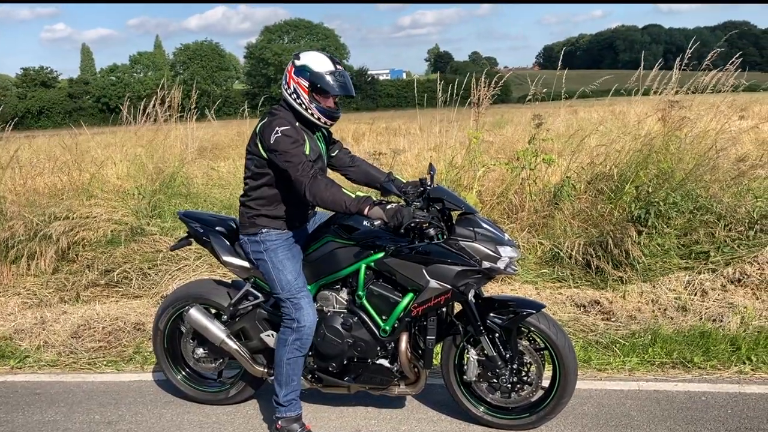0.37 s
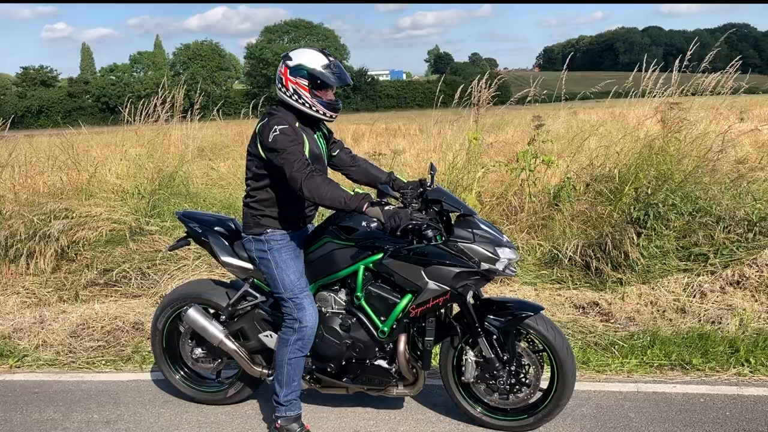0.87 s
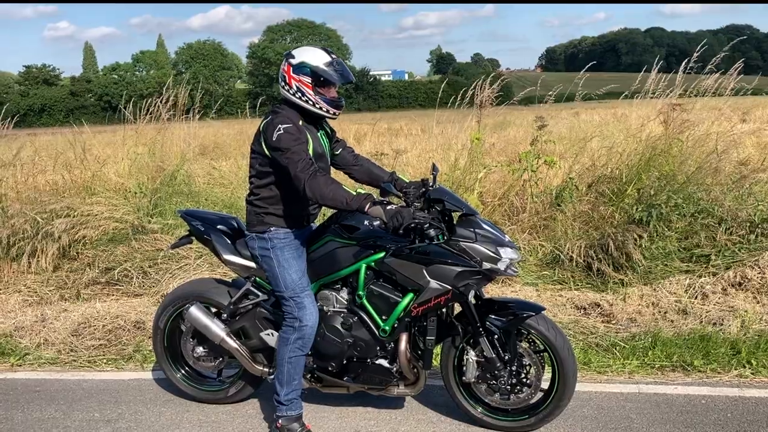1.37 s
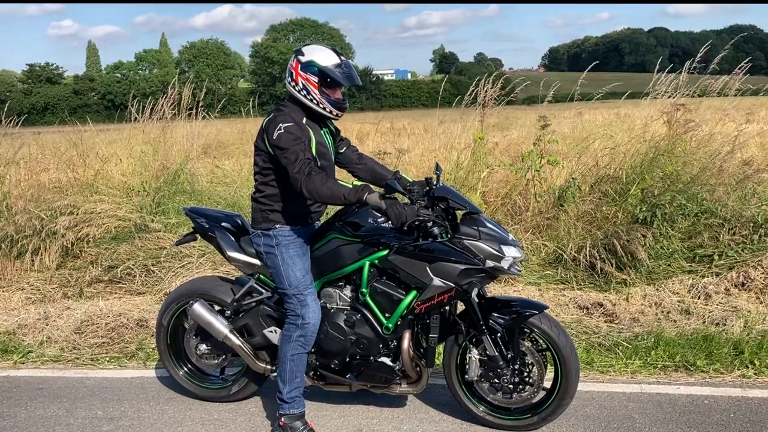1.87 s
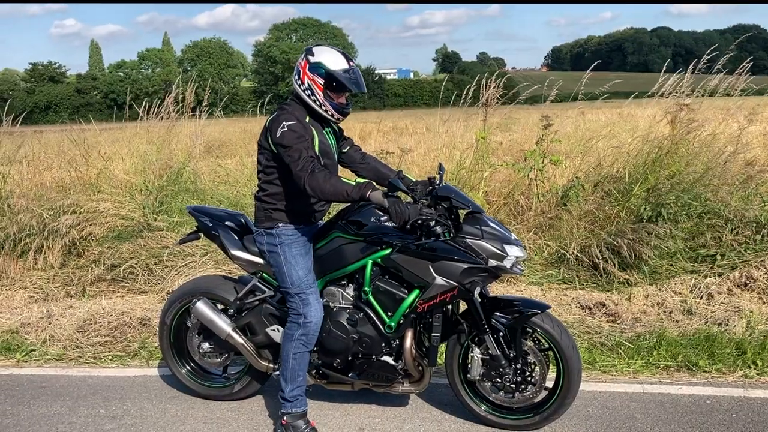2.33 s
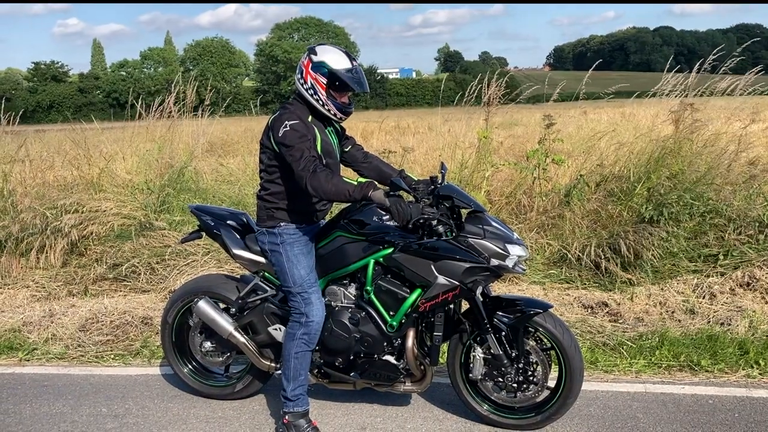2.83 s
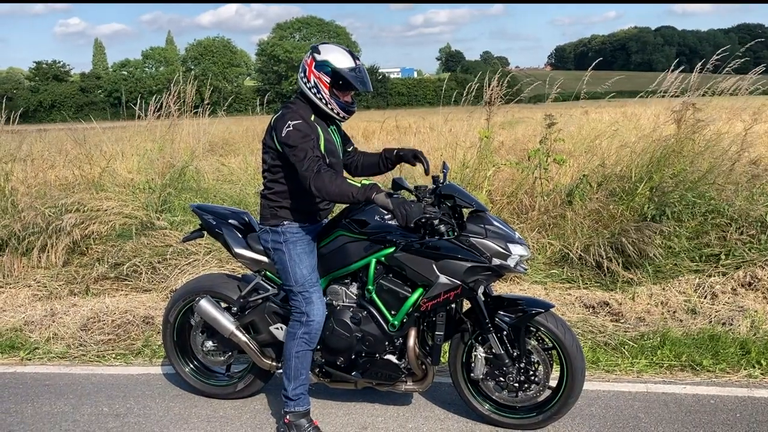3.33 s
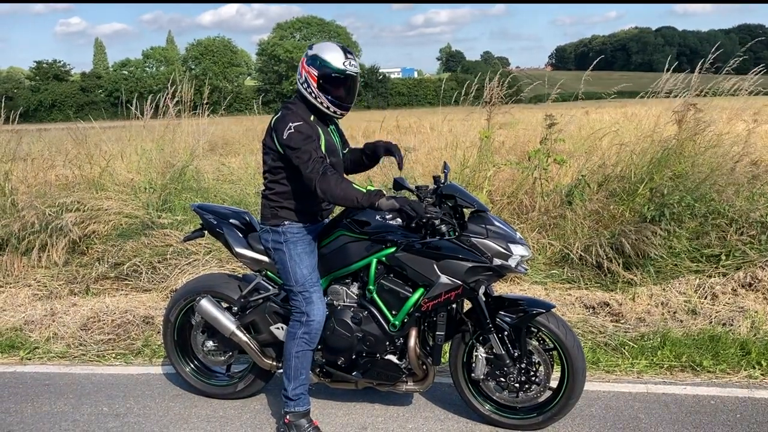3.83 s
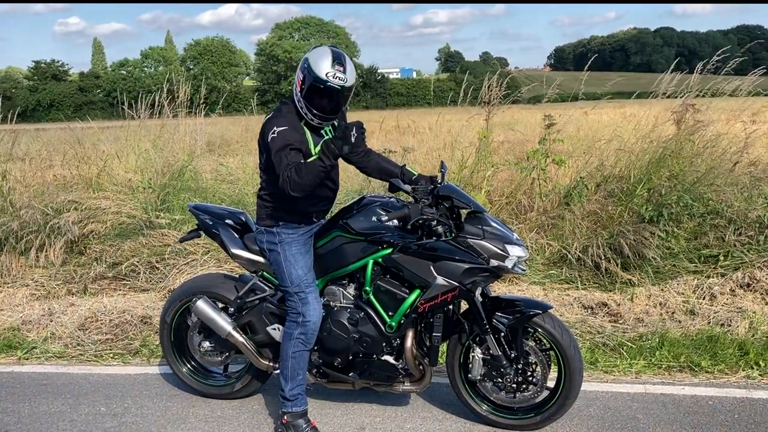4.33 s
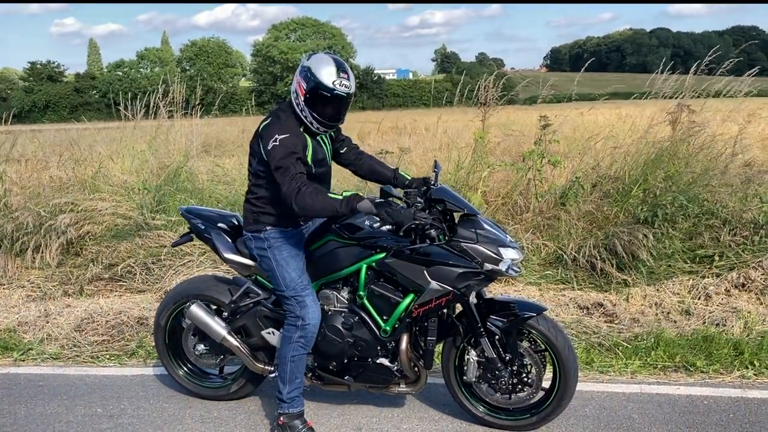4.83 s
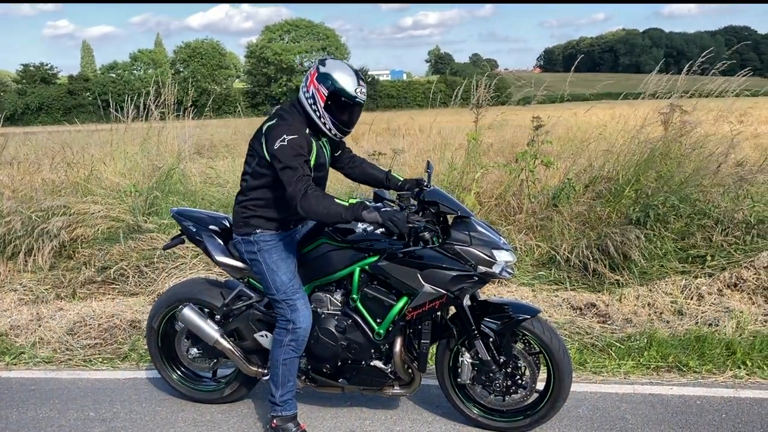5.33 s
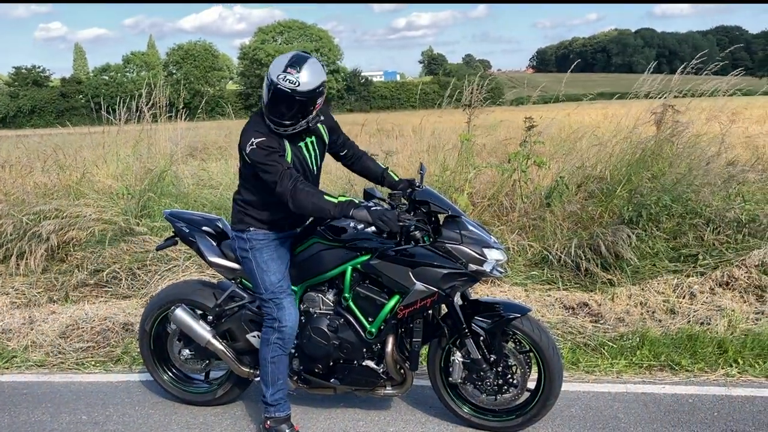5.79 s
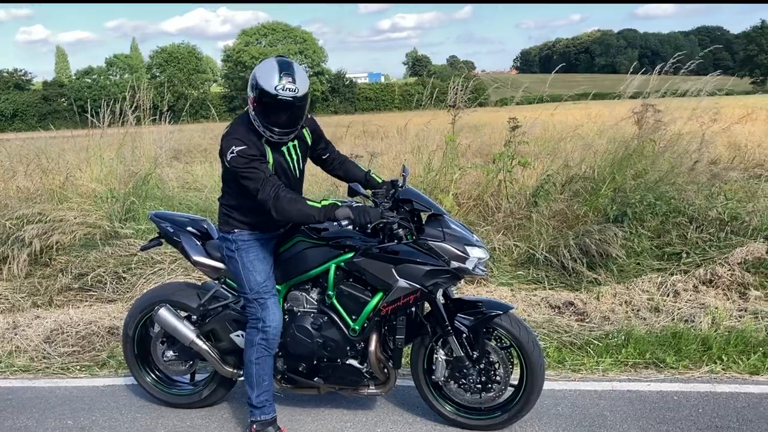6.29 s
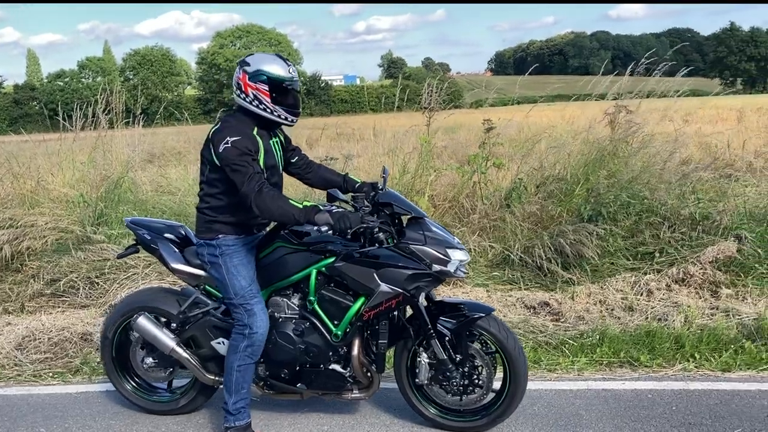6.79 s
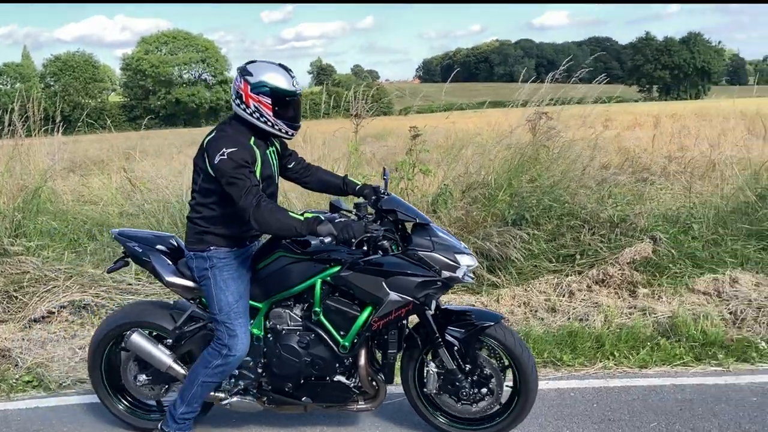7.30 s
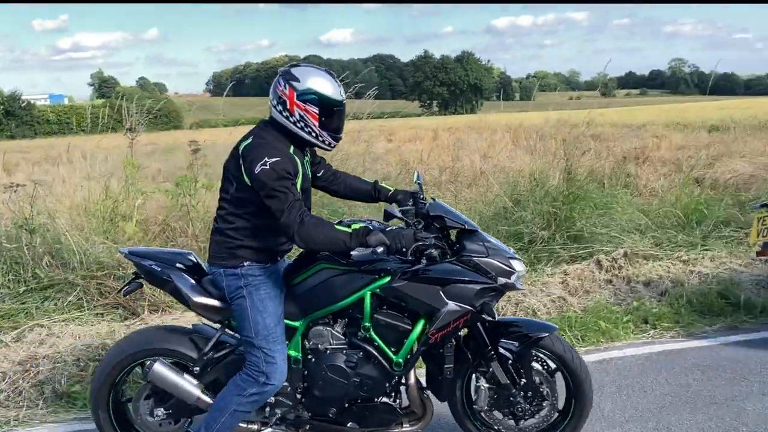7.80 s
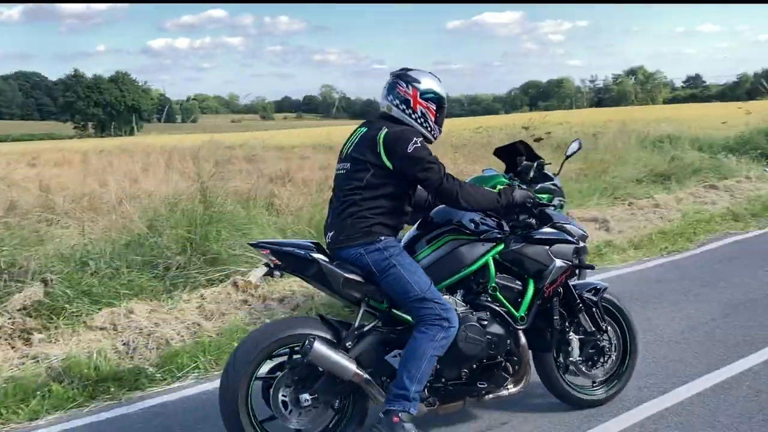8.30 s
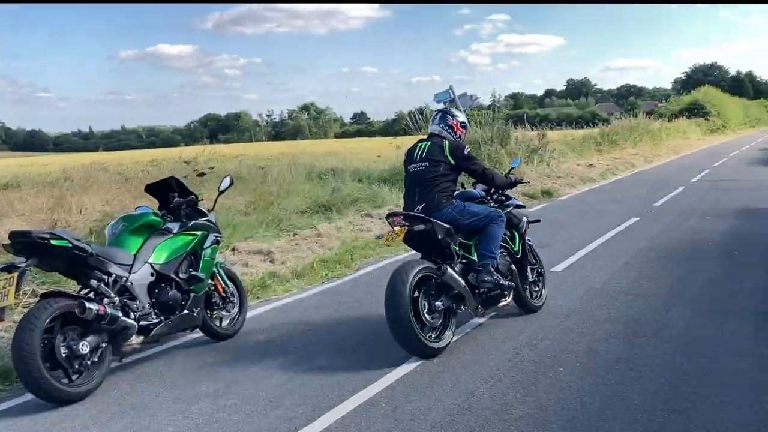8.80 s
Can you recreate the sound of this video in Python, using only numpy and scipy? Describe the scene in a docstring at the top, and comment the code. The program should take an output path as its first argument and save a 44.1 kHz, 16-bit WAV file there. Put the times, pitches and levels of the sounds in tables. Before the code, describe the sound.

Open roadside, close stereo microphone. From 0 to 0.8 s there is only soft distant air, low wind puffs, a very thin electric whine and faint clicks. A grinding, whining starter labours from 0.8 to 1.3 s, with sharp knocks. The four-cylinder engine catches with a couple of strong surges and settles by 1.7 s into a deep, even, booming idle with mechanical clatter. At 2.7 s a hard blip barks upward; a second at 3.05 s peaks higher around 3.2 s, then the revs fall unevenly until 4.2 s. A quieter idle hunts in lumpy pulses to 5.5 s, with loud metallic knocks near 5.1 and 5.5 s and a wavering thin whistle until 6.4 s. A soft-edged blip comes at 5.6 s, then quick stabs at 6.4, 6.7 and 6.9 s with more knocks. From 7 s it pulls away under load, roaring with singing gear whine, peaking around 7.5 s, dropping in pitch, dulling after 8.3 s, and rising slightly at the end at 9.1 s.

```python
"""A four-cylinder motorcycle at the roadside: it catches, idles, is blipped, hunts and pulls away.
The exhaust sums harmonics of the firing rate; clatter is noise puffed by each firing; gear whine is sines
locked to the crank. Before it, quiet air, wind puffs, a thin electric whine and a grinding starter; knocks
are coloured noise bursts and a thin whistle comes and goes at idle. All is heard in stereo."""
import sys
import numpy as np
from scipy import signal
from scipy.fft import rfft, irfft, next_fast_len
from scipy.io import wavfile
from scipy.ndimage import uniform_filter1d

SR = 44100
rng = np.random.default_rng(int(sys.argv[2]) if len(sys.argv) > 2 else 0)


def gain_from_db(level_db):
    """Turn a decibel level (scalar or array-like) into a linear amplitude factor."""
    decades = np.asarray(level_db, float) / 20
    return 10 ** decades


def generate_wav(signal):
    """Clip the signal to [-1, 1] and save it as 16-bit WAV at the path in sys.argv[1]."""
    frames = np.transpose(np.atleast_2d(signal))
    scaled = np.clip(frames, -1, 1) * 32767
    pcm = np.round(scaled).astype(np.int16)
    wavfile.write(sys.argv[1], SR, pcm)


N = 403515
T = np.arange(N) / SR

# Distant air. Each row: frequency in Hz, relative level in dB per Hz.
AIR_COLOUR = [(15, -22), (25, -4), (54, -2), (235, -16.5), (867, -16.5), (1610, -30), (2100, -37),
              (2440, -34), (3360, -46), (5500, -40), (9000, -55), (11700, -90), (19800, -120)]
AIR_RMS_DB = -49
# Thin electric whine of a pump, steady throughout. Each row: frequency in Hz, peak level in dB.
PUMP_TONES = [(1200, -66.5), (1604, -70), (1995, -77), (2406, -69)]
# Puffs of wind on the microphone. Each row: peak time in seconds, rms level in dB, 1/e half width in seconds.
GUSTS = [(.11, -55, .04), (.69, -42, 0.084), (1.08, -43, 0.14), (1.25, -35.5, .06)]
# Sharp metallic knocks. Each row: start in seconds, peak level in dB.
KNOCK_TIMES = [(0.018, -33), (0.331, -41), (0.791, -39), (0.822, -19.5), (1.179, -13), (1.448, -16),
               (1.764, -15), (4.502, -30), (5.075, -6.5), (5.114, -8.5), (5.139, -12.5), (5.182, -12.5),
               (5.336, -13.5), (5.547, -11.5), (5.572, -12), (6.358, -9), (6.399, -7.5), (6.645, -9),
               (6.827, -11.5)]
KNOCK_T60_S = 0.072
# Broad colour of engine clatter. Each row: frequency in Hz, relative level in dB per Hz.
CLATTER_COLOUR = [(150, -18), (300, -12), (450, -11.5), (700, -13.5), (1000, -12.5), (1500, -15),
                  (1900, -13), (2250, -15.5), (2800, -14.5), (3350, -17.5), (4000, -17), (5200, -19),
                  (6500, -21), (8500, -23), (11700, -23), (15500, -26)]
# Ringing of cases and bodywork. Each row: frequency in Hz, width in Hz, rise over the broad colour in dB.
CASE_RINGS = [(544, 80, 7), (877, 90, 4), (1200, 130, 8), (1870, 170, 8), (2620, 260, 7.5), (3780, 200, 3),
              (4200, 240, 2)]
# Starter. Each row: time in seconds, gear mesh in Hz, whine level in dB, grind rms level in dB.
STARTER_RUN = [(.82, 700, -60, -33), (.91, 860, -35, -37), (.96, 800, -35, -37), (1.03, 630, -33, -31),
               (1.065, 500, -38, -30), (1.115, 535, -41, -35), (1.13, 540, -55, -44),
               (1.168, 540, -60, -46), (1.18, 560, -44, -27), (1.21, 625, -38, -32), (1.3, 700, -50, -35)]
# Starter grind. Each row: frequency in Hz, relative level in dB per Hz.
GRIND_COLOUR = [(120, -61), (200, -21), (789, -7), (864, -9), (980, -5.5), (1980, -3), (4640, -15),
                (6770, -13.5), (15000, -41)]
# Engine speed, to which the hunting wobble is added. Each row: time in seconds, firings per second.
FIRING_RATE = [(1.27, 48.4), (1.41, 58), (1.58, 51.5), (2.0, 48), (2.69, 48.4), (2.77, 80), (2.825, 104.5),
               (2.855, 109.5), (3.05, 82.8), (3.205, 142.5), (3.44, 107.2), (3.51, 97.8), (3.86, 64),
               (4.1, 52.4), (4.3, 48.4), (4.98, 44.5), (5.51, 44.2), (5.7, 60.9), (5.92, 46.5),
               (6.345, 40.9), (6.495, 77.5), (6.6, 62.9), (6.74, 81.4), (6.825, 73.9), (7.005, 105.8),
               (7.18, 104.3), (7.37, 120.5), (7.48, 122.8), (7.59, 118.9), (7.72, 108.2), (7.92, 98.4),
               (8.74, 90), (8.83, 81.2), (8.91, 91), (8.97, 88.5), (9.04, 95.5), (9.15, 100.5)]
# Slow level under blips and surges. Each row: time in seconds, exhaust in dB, clatter in dB before its gain.
SLOW_LEVELS = [(1.27, -24, -37.5), (1.5, -16.5, -36.5), (1.75, -14, -37), (2.68, -13, -37),
               (2.92, -11.5, -33.5), (3.17, -13, -33.5), (3.25, -7.5, -30), (3.5, -13, -37),
               (3.8, -15.5, -41), (3.97, -22.5, -45), (4.4, -22.5, -41.5), (5.5, -23, -42),
               (5.78, -20, -41.5), (5.86, -16.5, -41), (6.2, -16.5, -39.5), (6.34, -17.5, -41),
               (6.58, -13.5, -39), (6.82, -10.5, -38), (7.02, -15.5, -38.5), (7.29, -9.5, -33.5),
               (7.66, -12, -36), (8.16, -11.5, -37), (8.75, -12, -41.5), (9.15, -13.5, -43.5)]
CLATTER_GAIN_DB = 12
# Uneven firing, throttle shut. Each row: time in seconds, spread of firing strength in dB.
UNEVEN_FIRING = [(1.27, 3.5), (1.7, 2.5), (1.8, .5), (2.7, .5), (2.88, 1.2), (2.98, 1.5), (3.03, 3.5),
                 (3.2, .8), (3.4, 1.5), (3.5, 5), (3.9, 5), (4.4, 2.5), (5.55, 2.5), (5.75, 4), (5.95, 1.5),
                 (6.34, .8), (6.56, 4), (6.8, .6)]
# Throttle openings, the last the pull away. Each row: opening and shutting times in seconds, exhaust rise in dB,
# clatter rise in dB, load from 0 to 1.
THROTTLE_OPENINGS = [(2.669, 2.835, 2.5, 7, 0.81), (3.04, 3.18, 0.5, 3.5, 0.67),
                     (5.54, 5.718, 12, 4.5, 0.11), (6.346, 6.496, 8.5, 6, 0.2), (6.606, 6.76, 6, 5, 0.28),
                     (6.813, 6.956, 5.5, 8.5, 0.57), (6.925, 9.297, 0, 0, 0.9)]
OPENING_S, CLOSING_S = 0.0533, 0.032
OPEN_SPREAD_DB, OPEN_SHARP_DB_PER_OCTAVE = .4, 1.8  # an open throttle fires evenly and sharply
# shut, pulses soften by this many dB per octave for each firing per second over idle
IDLE_FIRINGS_PER_S, OVERRUN_SHARP_DB = 48, -.11
# Runs of strong firings, catching and hunting. Each row: peak in seconds, rise in dB, 1/e half width in seconds.
STRONG_RUNS = [(1.31, 10, 0.048), (1.39, 10, 0.033), (1.53, 4.5, 0.034), (1.6, 1.5, 0.038), (3.84, 4, .04),
               (4.15, 5, 0.054), (4.25, 4, 0.027), (4.382, 8, 0.049), (4.535, 9, 0.052), (4.719, 8, 0.063),
               (4.869, 10.5, 0.038), (5.05, 11, 0.041), (5.239, 8.5, 0.045), (5.41, 7.5, 0.0503),
               (5.53, 7.5, 0.018)]
CLATTER_DB_PER_SURGE_DB = 0.34
# Exhaust pipe, throttle shut. Each row: frequency in Hz, relative level in dB.
PIPE_COLOUR = [(20, -80), (48, -5), (96, -6.5), (145, 2.5), (195, -2.5), (245, -8.5), (300, -22),
               (380, -32), (480, -64), (550, -24), (700, -61), (1100, -31)]
SMEAR_RAD = 0.243  # per squared harmonic number: the pipe spreads each pulse in time
# Pulses at open throttle. Each row: multiple of the firing rate, relative level in dB before the pipe.
LOADED_ORDERS = [(0.5, -27), (1, 0), (1.5, -10), (2, 0.5), (2.5, -18), (3, -8), (3.5, -39), (4, -6.5),
                 (4.5, -34), (5, -12.5), (5.5, -47), (6, -17), (7, -23), (8, -22.5), (9, -29)]
# Exhaust pipe at open throttle. Each row: frequency in Hz, gain in dB.
OPEN_PIPE_COLOUR = [(60, 0.5), (110, 1.5), (190, 4), (240, 1.5), (275, 3), (310, -3), (370, -1.5), (470, 2),
                    (540, 1), (620, 3.7), (800, -3), (1000, 2)]
LEAVING_S, DULLING_DB = 8.3, -5.5  # past this time upper orders fade, in dB per octave per second
REVVING_DB = .012  # rise of upper orders per octave for each firing per second squared of speeding up
GEAR_TEETH_PER_FIRING, LOWER_TEETH_PER_FIRING = 24.9, 16.4
# Gear whine. Each row: time in seconds, level in dB before its gain, body colour and pull.
WHINE_LEVEL = [(1.27, -50), (2.68, -46), (2.82, -31), (2.9, -39), (3.22, -40), (3.47, -32), (3.9, -50),
               (4.4, -49), (4.6, -44), (5.55, -42), (6.0, -51), (6.34, -46), (6.47, -33), (6.56, -44),
               (6.74, -33), (6.9, -40), (7.0, -26), (7.5, -30), (7.75, -37), (8.2, -45), (9.15, -47)]
# Other gear tones. Each row: time in seconds, octave of the whine in dB, fuzzy lower mesh in dB.
GEAR_OVERTONES = [(1.27, -60, -62), (6.2, -54, -62), (6.75, -44, -60), (6.82, -32, -60), (6.88, -54, -60),
                  (7.15, -42, -50), (7.35, -44, -33), (7.75, -45, -33), (7.9, -35, -48), (8.4, -39, -58),
                  (8.9, -52, -62)]
# Thin whistle at idle. Each row: time in seconds, frequency in Hz, level in dB.
WHISTLE_RUN = [(4.7, 2600, -60), (4.82, 2600, -41), (5.0, 2700, -48), (5.25, 2800, -40), (5.5, 2700, -50),
               (5.95, 2900, -39), (6.1, 2830, -33), (6.28, 2680, -38), (6.4, 2600, -62)]
# Stereo image by frequency. Each row: frequency in Hz, left lead in radians, level balance left over right in dB,
# likeness of left and right from 0 to 1.
STEREO_IMAGE = [(40, -.2, 2.3, .95), (100, -.15, 1.9, .992), (380, -.3, 2.1, .99), (520, -.3, -1.5, .93),
                (900, -.4, 1.1, .97), (1500, -.3, 0, .97), (1900, .1, 0, .99), (2300, .7, 0, .9),
                (3000, .7, -.5, .9), (3500, 1.3, -1.5, .78), (4200, 1.9, -.5, .85), (4900, 2.5, 0, .8),
                (5300, np.pi, 0, 1), (5600, np.pi, 0, 1), (6100, 3.9, 0, .8), (6900, 4.8, 0, .75),
                (8100, 2 * np.pi, 0, 1), (8900, 2 * np.pi, 0, 1), (10000, 7.8, 0, .72),
                (11150, 3 * np.pi, 0, 1), (12350, 3 * np.pi, 0, 1), (13400, 11, 0, .78),
                (14550, 4 * np.pi, 0, 1)]


def read(points, hz):
    """Columns of a table at the frequencies hz."""
    f, *columns = np.transpose(points)
    return np.squeeze([np.interp(np.log(hz + 1), np.log(f + 1), c) for c in columns])


def curves(rows, t=T):
    """Columns of a time table."""
    s, *columns = np.transpose(rows)
    return [np.interp(t, s, c) for c in columns]


def evened(x):
    """Scales to rms 1."""
    return x / np.sqrt(np.mean(x ** 2) + 1e-20)


def coloured(x, db_of_hz):
    """Causal minimum-phase filter with the given gain curve."""
    log_gain = np.log(gain_from_db(db_of_hz(abs(np.fft.fftfreq(16384, 1 / SR)))))
    taps = np.fft.ifft(np.exp(log_gain - 1j * signal.hilbert(log_gain).imag)).real[:4096]
    return signal.oaconvolve(x, taps)[:len(x)]


def while_on(start_s, end_s):
    """Gate with soft edges."""
    return np.clip(np.minimum(T - start_s, end_s - T) / 0.0057, 0, 1)


def swell(s, width_s):
    """A smooth hump of height 1."""
    return np.exp(-((T - s) / width_s) ** 2)


def body_db(hz):
    """Broad clatter colour with the ringing of the cases on top."""
    rings_db = sum(db / (1 + (2 * (hz - f) / width) ** 2) for f, width, db in CASE_RINGS)
    return read(CLATTER_COLOUR, hz) + rings_db


def surroundings():
    """Coloured noise for air, swelling low-band noise for wind, steady sines for the pump."""
    air = evened(coloured(rng.standard_normal(N), lambda hz: read(AIR_COLOUR, hz)))
    band = signal.butter(2, [30, 110], "band", fs=SR, output="sos")
    rumble = evened(signal.sosfilt(band, rng.standard_normal(N)))
    gusts = sum(gain_from_db(db) * swell(s, width_s) for s, db, width_s in GUSTS)
    pump = sum(gain_from_db(db) * np.sin(2 * np.pi * hz * T) for hz, db in PUMP_TONES)
    return gain_from_db(AIR_RMS_DB) * air + gusts * rumble + pump


def knocks():
    """Short decaying noise bursts in the colour of the ringing cases."""
    out, t = np.zeros(N), T[:6000]
    envelope = np.minimum(t / 0.0032, 1) * gain_from_db(-60 * t / KNOCK_T60_S)
    for s, db in KNOCK_TIMES:
        noise = rng.standard_normal(len(t))
        burst = coloured(noise * envelope, lambda hz: 0.8 * body_db(hz) - 6 * (hz < 600))
        out[round(s * SR):][:len(t)] += gain_from_db(db) * burst / abs(burst).max()
    return out


def starter():
    """Pinion mesh harmonics that sag against compression, in grinding noise."""
    hz, whine_db, grind_db = curves(STARTER_RUN)
    waver_rad = .35 * evened(uniform_filter1d(rng.standard_normal(N), 400))
    phase = 2 * np.pi * np.cumsum(hz) / SR + waver_rad
    harmonics_db = [-4, 0, -1, -3, -9, -16, -10, -8]
    whine = sum(gain_from_db(db) * np.sin(k * phase) for k, db in enumerate(harmonics_db, 1))
    grind = evened(coloured(rng.standard_normal(N), lambda f: read(GRIND_COLOUR, f)))
    on = while_on(STARTER_RUN[0][0], STARTER_RUN[-1][0])
    return on * (gain_from_db(whine_db) * whine + gain_from_db(grind_db) * grind)


def running(rate):
    """What the throttle and the surges do to level, evenness, sharpness and load."""
    (exhaust_db, clatter_db), (uneven_db,) = curves(SLOW_LEVELS), curves(UNEVEN_FIRING)
    opened, load = np.zeros(N), np.zeros(N)
    for opens_s, shuts_s, louder_db, rattle_db, share in THROTTLE_OPENINGS:
        twist = np.clip(np.minimum((T - opens_s) / OPENING_S, 1 + (shuts_s - T) / CLOSING_S), 0, 1)
        exhaust_db = exhaust_db + louder_db * twist
        clatter_db = clatter_db + rattle_db * twist
        opened = np.maximum(opened, twist)
        load = np.maximum(load, share * twist)
    surges_db = sum(db * swell(s, width_s) for s, db, width_s in STRONG_RUNS)
    spread_db = opened * OPEN_SPREAD_DB + (1 - opened) * uneven_db
    overrun_db = OVERRUN_SHARP_DB * np.maximum(rate - IDLE_FIRINGS_PER_S, 0)
    sharp_db = opened * OPEN_SHARP_DB_PER_OCTAVE + (1 - opened) * overrun_db
    clatter_db = clatter_db + CLATTER_DB_PER_SURGE_DB * surges_db
    return exhaust_db + surges_db, clatter_db, spread_db, sharp_db, np.clip(load, 0, 1)


def shut_pulses(rate, phase, sharp_db):
    """Harmonics of the firing rate, smeared in phase, evened by their expected power after the pipe."""
    pulses, power = np.zeros(N), np.zeros(N)
    for k in range(1, 20):
        size = gain_from_db(sharp_db * np.log2(k * rate / 170)) * np.clip((900 - k * rate) / 200, 0, 1)
        pulses += size * np.cos(k * phase + SMEAR_RAD * k * k)
        power += .5 * (size * gain_from_db(read(PIPE_COLOUR, k * rate))) ** 2
    return pulses / np.sqrt(power)


def loaded_pulses(rate, phase):
    """Steep pulses at open throttle, rms 1; unequal headers add the half orders."""
    dull_db = DULLING_DB * np.maximum(T - LEAVING_S, 0)
    bright_db = REVVING_DB * np.clip(uniform_filter1d(SR * np.gradient(rate), 2000), 0, 450)
    bark, power = np.zeros(N), np.zeros(N)
    for k, db in LOADED_ORDERS:
        tilt_db = bright_db * max(np.log2(k / 2), 0) + dull_db * max(np.log2(k / 3), 0)
        size = gain_from_db(db + read(OPEN_PIPE_COLOUR, k * rate) + tilt_db)
        bark += size * np.cos(k * phase - 0.256 * k * k)
        power += .5 * size ** 2
    return bark / np.sqrt(power)


def engine_clatter(rate, firings, puff_luck):
    """Body-coloured noise, puffed by each firing and pricked by random valve ticks."""
    since_firing_s = ((firings + 0.12) % 1) / rate
    puff = 0.54 + np.exp(-since_firing_s / 0.0079) * gain_from_db(2.0 * puff_luck)
    puff = uniform_filter1d(puff, size=130)
    ticks = gain_from_db(2.5 * np.minimum(rng.exponential(1, N), 3)) * (rng.random(N) < 60 / SR)  # 60 a second
    n = np.arange(900)
    ticks = np.convolve(ticks, n / 40 * np.exp(-n / 110))[:N]
    return evened(coloured(rng.standard_normal(N) * (puff + 0.16 * ticks), body_db))


def gear_whine(rate, firings, phase, pull_db):
    """Tooth-mesh sines locked to the crank, wavering in phase and fluttering with each firing."""
    (whine_db,), (octave_db, lower_db) = curves(WHINE_LEVEL), curves(GEAR_OVERTONES)
    waver = evened(uniform_filter1d(rng.standard_normal((3, N)), 500))
    mesh = 2 * np.pi * GEAR_TEETH_PER_FIRING * firings + 0.47 * waver[0]
    lower_mesh = 2 * np.pi * LOWER_TEETH_PER_FIRING * firings + 1.1 * waver[2]
    mesh_db = .5 * body_db(GEAR_TEETH_PER_FIRING * rate) + whine_db + pull_db + 10.5
    whine = gain_from_db(mesh_db) * np.sin(mesh)
    whine += gain_from_db(octave_db) * np.sin(2 * mesh)
    whine += gain_from_db(lower_db) * np.sin(lower_mesh)
    flutter = (1 + .45 * np.cos(phase)) * gain_from_db(2.2 * waver[1])
    return flutter * whine


def engine():
    """One crank drives exhaust pulses through the pipe, clatter and gear mesh."""
    (rate,) = curves(FIRING_RATE)
    exhaust_db, clatter_db, spread_db, sharp_db, load = running(rate)
    # hunting: strong firings speed the crank up, weak ones let it sag
    surge_db = uniform_filter1d(exhaust_db, 3000, origin=500) - uniform_filter1d(exhaust_db, 12000)
    surge_db = surge_db * while_on(4.1, 5.55)
    rate = rate * (1 + .018 * surge_db)
    pull_db = np.clip(.06 * SR * np.gradient(surge_db), -6, 6)  # gears sing while the crank speeds up
    firings = np.cumsum(rate) / SR
    draws = rng.standard_normal((int(firings[-1]) + 2, 3))  # one row a firing
    luck = draws[(firings + .5).astype(int)].T
    strength = gain_from_db(spread_db * uniform_filter1d(luck[0], 90) - 0.065 * spread_db ** 2)
    late = .018 * spread_db * uniform_filter1d(luck[1], 200)  # weak running also scatters the timing
    phase = 2 * np.pi * (firings + late)
    on = while_on(SLOW_LEVELS[0][0], 2 * T[-1])
    drive = on * strength * gain_from_db(exhaust_db)
    pulses = shut_pulses(rate, phase, sharp_db)
    boom = coloured(drive * np.sqrt(1 - load) * pulses, lambda hz: read(PIPE_COLOUR, hz))
    bark = drive * np.sqrt(load) * loaded_pulses(rate, phase)
    clatter = gain_from_db(clatter_db + CLATTER_GAIN_DB) * engine_clatter(rate, firings, luck[2])
    return boom + bark + on * (clatter + gear_whine(rate, firings, phase, pull_db))


def whistle():
    """A sine wavering in phase and level."""
    hz, db = curves(WHISTLE_RUN)
    waver = evened(uniform_filter1d(rng.standard_normal((2, N)), 400))
    tone = np.sin(2 * np.pi * np.cumsum(hz) / SR + 0.99 * waver[0])
    return while_on(WHISTLE_RUN[0][0], WHISTLE_RUN[-1][0]) * gain_from_db(db + 2.5 * waver[1]) * tone


def scene():
    """The summed scene in stereo: a lead, a balance and a scattered share that differs left and right."""
    sound = surroundings() + knocks() + starter() + engine() + whistle()
    size = next_fast_len(N + 4096)
    lead_rad, balance_db, like = read(STEREO_IMAGE, np.fft.rfftfreq(size, 1 / SR))
    like = np.sqrt(np.clip(like, 0, 1))
    scatter = rng.standard_normal((2, 4000)) * np.exp(-np.arange(4000) / 1500)  # nearby reflections
    scatter = rfft(scatter / np.linalg.norm(scatter, axis=1)[:, None], size)
    side = np.array([[.5], [-.5]])
    shared = like * np.exp(1j * side * lead_rad)
    stereo = gain_from_db(side * balance_db) * (shared + np.sqrt(1 - like ** 2) * scatter)
    return irfft(rfft(sound, size) * stereo, size)[:, :N]


def roll_off(x):
    """The treble ends steeply here."""
    return signal.sosfilt(signal.butter(12, 16400, fs=SR, output="sos"), x)


def record(dry):
    """Bass cut, soft overload of the input and band limit."""
    cut = signal.sosfilt(signal.butter(3, 36, "high", fs=SR, output="sos"), dry)
    squeezed = 1.1 * np.tanh(cut / 1.1)
    lowpass = signal.firwin(511, 15850, window=("kaiser", 9), fs=SR)
    mix = signal.oaconvolve(squeezed, lowpass[None], "same")
    return roll_off(mix)


dry = scene()
out = record(dry)
generate_wav(out)
```